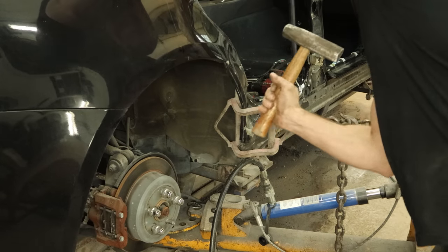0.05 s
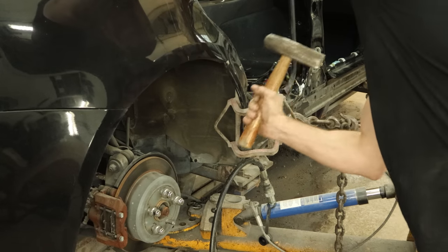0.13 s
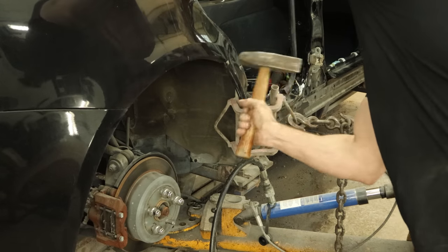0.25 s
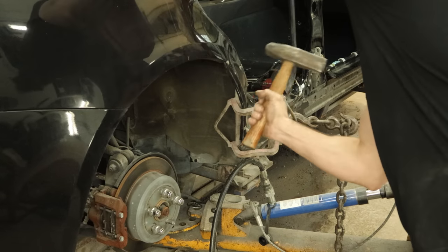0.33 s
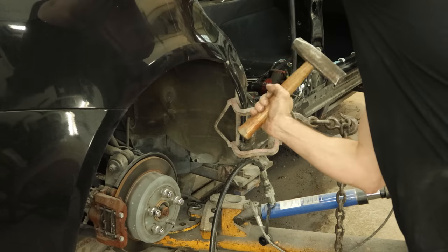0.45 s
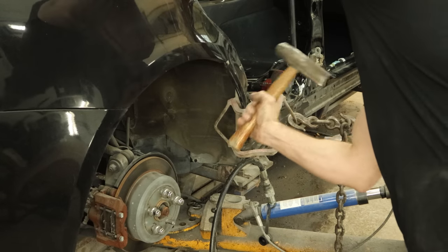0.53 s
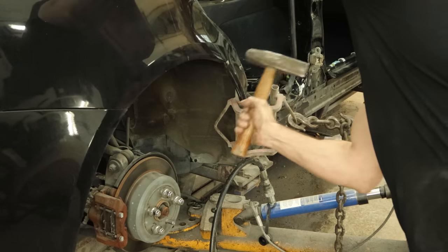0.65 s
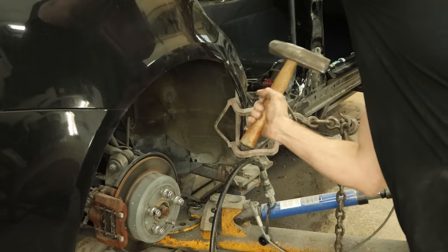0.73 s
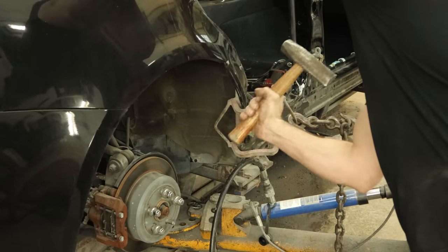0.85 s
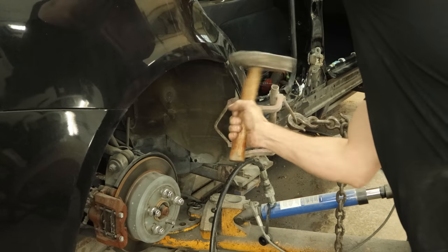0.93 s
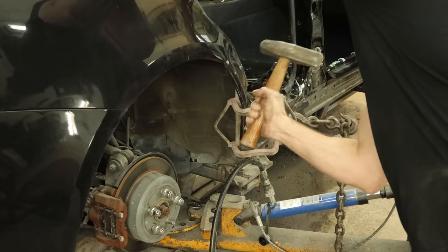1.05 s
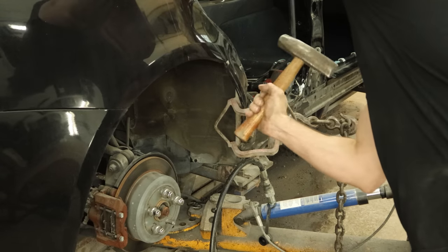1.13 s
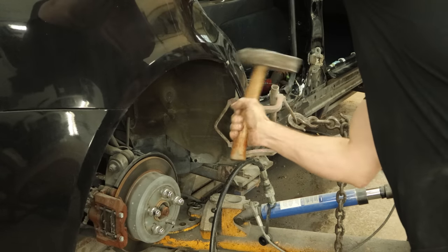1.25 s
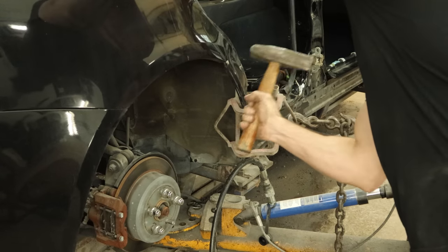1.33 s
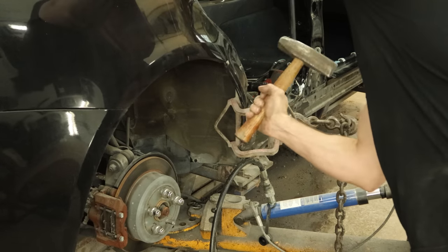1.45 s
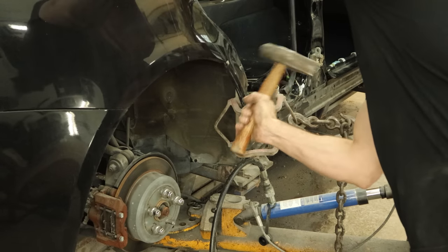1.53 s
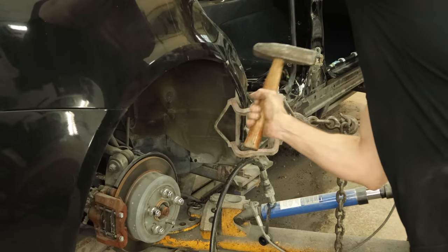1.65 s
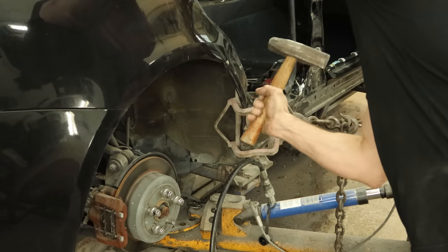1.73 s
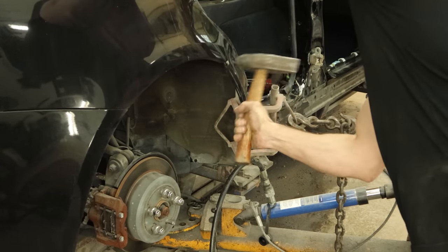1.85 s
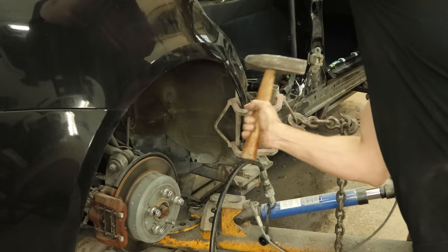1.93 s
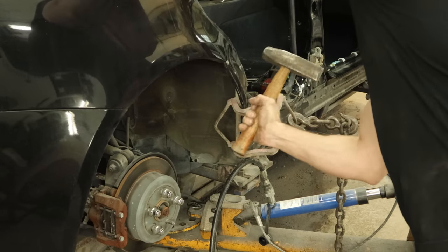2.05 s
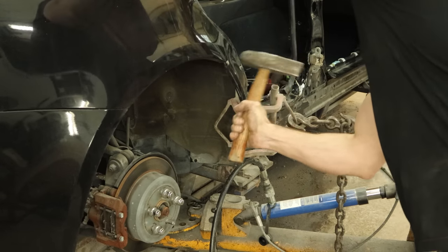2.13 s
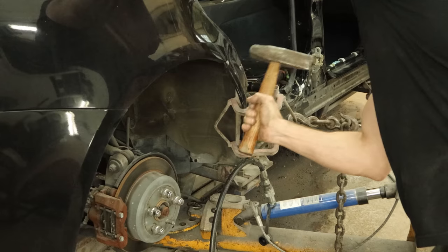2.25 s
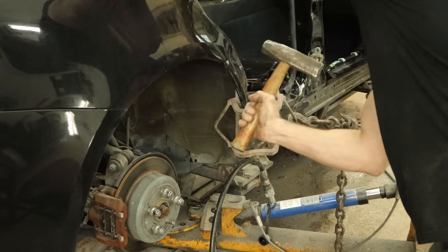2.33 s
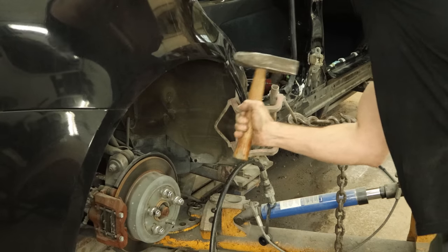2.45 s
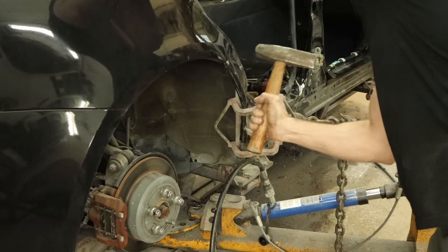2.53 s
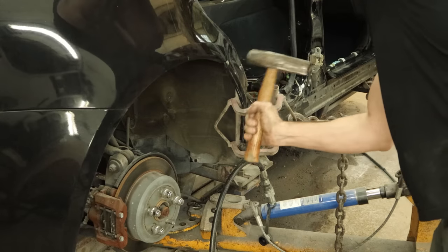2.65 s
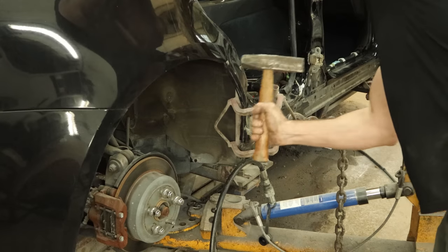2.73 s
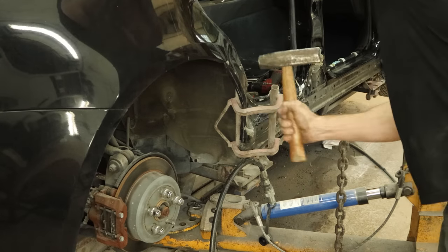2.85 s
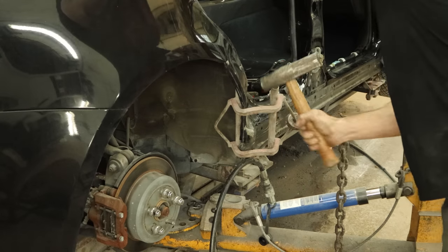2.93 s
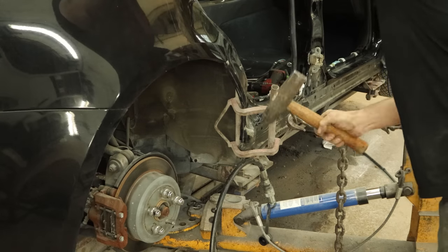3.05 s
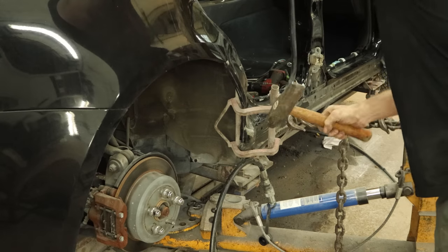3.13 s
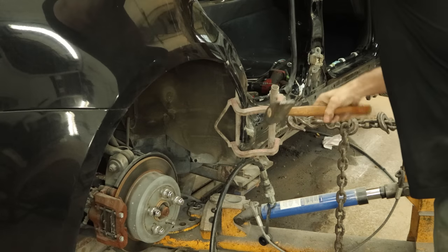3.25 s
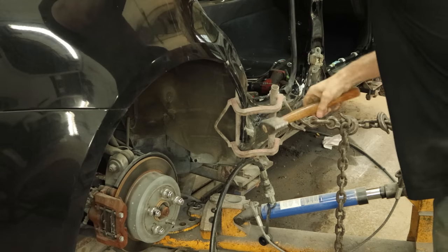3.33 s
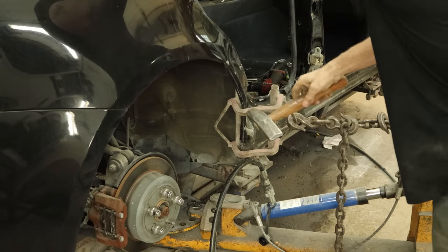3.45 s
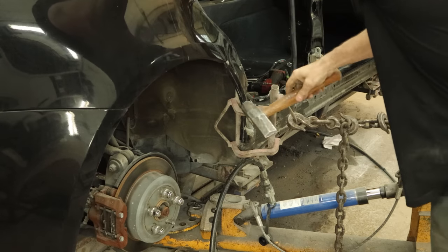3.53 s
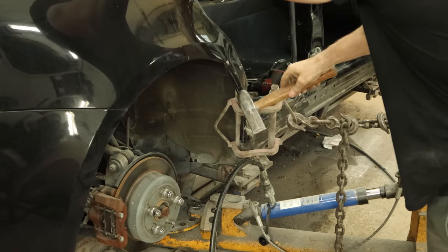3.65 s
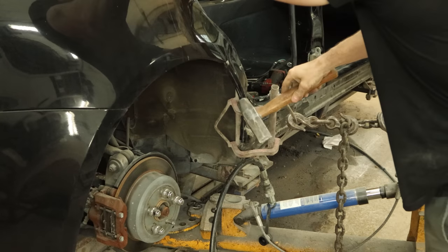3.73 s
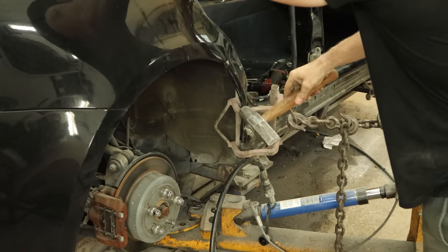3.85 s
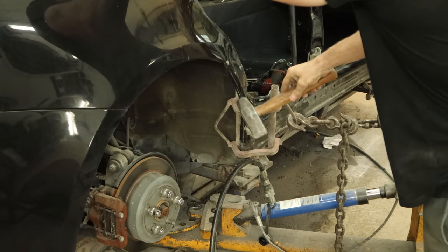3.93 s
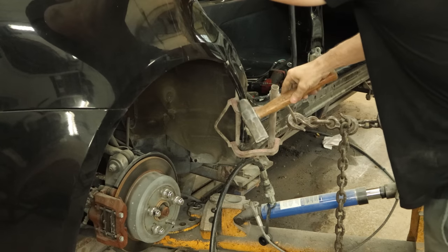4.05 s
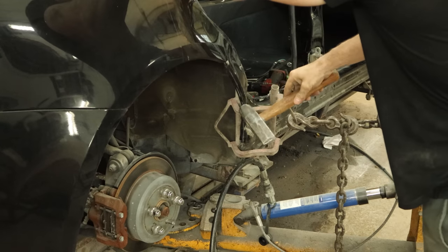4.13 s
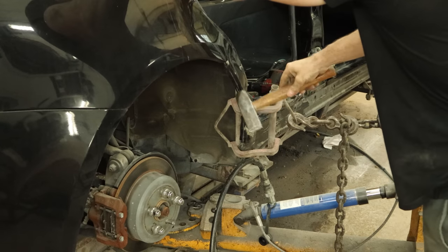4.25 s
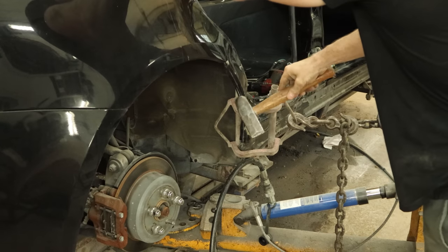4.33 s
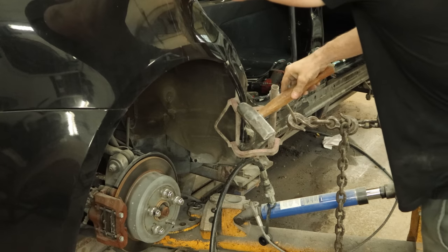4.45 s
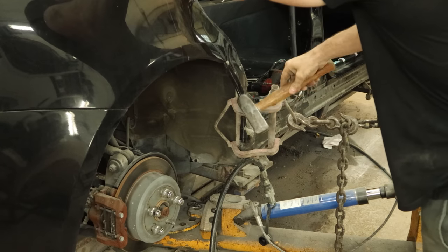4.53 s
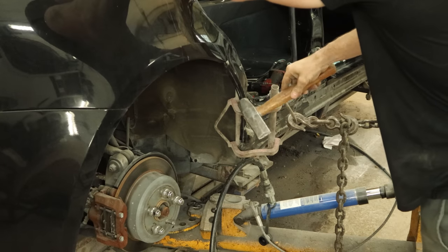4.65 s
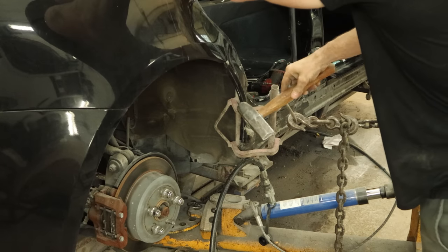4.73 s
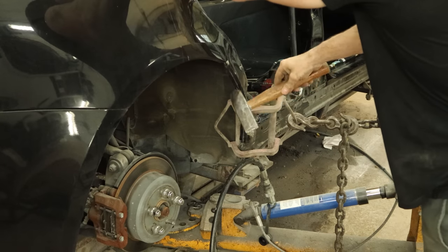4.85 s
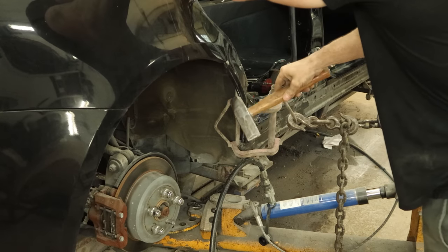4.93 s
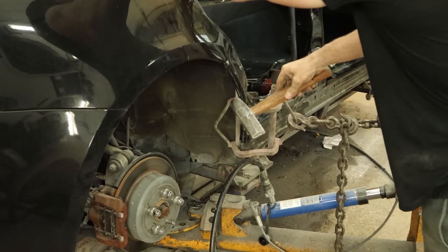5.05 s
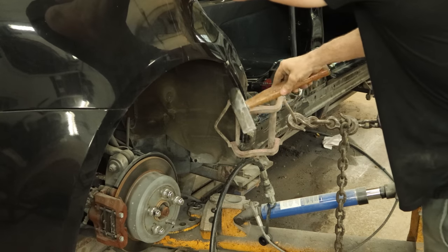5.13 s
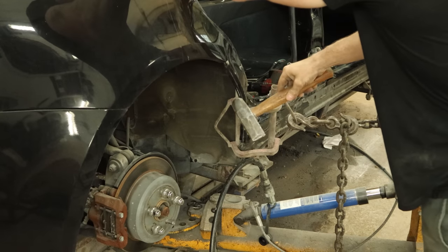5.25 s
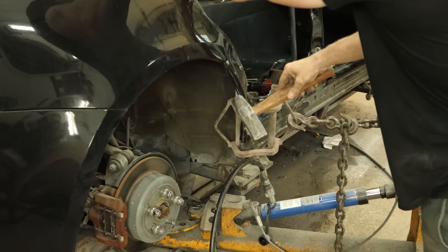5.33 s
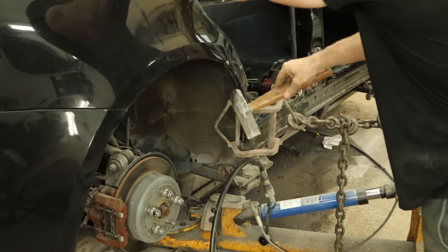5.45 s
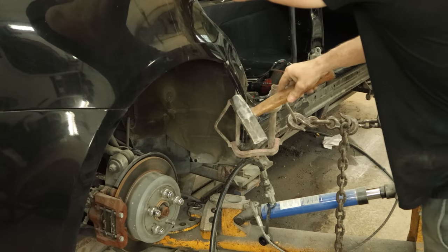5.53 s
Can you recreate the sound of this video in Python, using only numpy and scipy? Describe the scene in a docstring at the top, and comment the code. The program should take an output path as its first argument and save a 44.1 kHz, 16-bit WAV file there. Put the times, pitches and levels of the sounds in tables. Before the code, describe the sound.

A car repair workshop with quiet low rumble and a thin, faintly whistling hiss, picked up by a close mono microphone. From about 0.3 s a heavy steel hammer hits one spot of a car's crumpled wheel arch: nine hard blows, first almost 0.4 s apart, then about 0.3 s, ending at 2.8 s. They grow to a peak near 1.7 s, then ease off slightly. Each is an abrupt midrange crash and clang with a low thud, the body shell humming behind it and the room returning a diffuse wash under a second long. Loud hits sound compressed and blunted. The ringing fades; at 3.2 s there is a barely perceptible bright tick as the grip changes. From 3.8 to 5.5 s seven lighter, hollow knocks follow every 0.3 s along the edge, each with a different short clank; the one near 4.7 s is distinctly loudest. The last is still ringing near the end.

```python
"""Room rumble and a thin, singing hiss, then a hammer on the crumpled sheet metal of a car's wheel arch.
Nine hard blows land on one spot; a faint tick marks the change of grip; seven lighter knocks wander the edge.
Each stroke mixes dense noise bands (crash), damped sines (clang, knock, body ringing) and a steel tick.
A swelling noise wash is the repair workshop's answer. A gain control ducks the loud blows, a soft
clipper rounds their peaks, and a low-pass trims the top."""
import sys
import numpy as np
from scipy import signal
from scipy.fft import rfft, irfft
from scipy.io import wavfile
from scipy.ndimage import uniform_filter1d, minimum_filter1d

SR = 44100
rng = np.random.default_rng(int(sys.argv[2]) if len(sys.argv) > 2 else 0)


def master(y):
    """Save y as 16-bit WAV."""
    cut = np.clip(np.atleast_2d(y).T, -1, 1)
    pcm = np.round(cut * 32767)  # scale
    wavfile.write(sys.argv[1], SR, pcm.astype(np.int16))


N = 246210  # length of the scene [samples]
RING = np.arange(round(1.3 * SR)) / SR  # time since the stroke [s]
CUTOFF_HZ = 16100

# Levels inside a sound are relative: each sound is scaled to unit energy before it is mixed.
# Steady room rumble and microphone hiss: (frequency [Hz], relative density [dB per Hz])
FLOOR = [(20, -28), (50, -17), (85, -1), (150, -4.5), (300, -7), (500, -17), (1000, -20), (1900, -30.5),
         (4500, -31.5), (8200, -32), (9700, -28), (10700, -40), (12200, -40.5), (15500, -51)]
# Narrow bands that sing in the hiss: (centre [Hz], width [Hz], boost [dB])
HISS_PEAKS = [(7330, 150, 8), (8600, 200, 4.5), (9750, 240, 0.5), (11800, 220, 12)]
# How long the workshop rings: (frequency [Hz], t60 [s])
WORKSHOP = [(50, 0.66), (250, 0.93), (900, 0.74), (1800, 0.94), (3500, 0.64), (6500, 0.58), (10000, 0.26),
            (15000, 0.19)]
# What the edge sends into the room: (frequency [Hz], relative density [dB per Hz])
EDGE_ECHO = [(25, -26), (55, -11), (110, -14.5), (180, 1.5), (300, -3.5), (480, -6.5), (700, -8.5),
             (1000, -9.5), (1600, -14.5), (2800, -19.5), (4500, -24), (7500, -32.5), (11000, -38),
             (15000, -45)]
# What the struck spot sends into the room: (frequency [Hz], relative density [dB per Hz])
SPOT_ECHO = [(25, -21), (55, -11), (110, -4), (180, -9.5), (300, -3.5), (480, -5.5), (700, -0.5),
             (1000, -6.5), (1600, -8.5), (2800, -16.5), (4500, -23.5), (7500, -27.5), (11000, -35),
             (15000, -43.5)]
# Steel meeting steel in the first instant: (frequency [Hz], relative density [dB per Hz], t60 [s])
STEEL_TICK = [(816, -16, 0.016), (4030, 3.5, 0.011), (13900, -5, 0.005)]
# Crowd of small modes in the metal of the edge: (frequency [Hz], relative density [dB per Hz], t60 [s])
EDGE_CRASH = [(25, -27, 0.36), (74.5, -52, 0.13), (175, -1.5, 0.16), (300, -3.5, 0.38), (595, 2, 0.3),
              (890, -12.5, 0.42), (1480, -9, 0.24), (2880, -11.5, 0.11), (4700, -19, 0.12),
              (7600, -23, 0.091), (10400, -34.5, 0.064), (15000, -28, 0.03)]
# Crowd of small modes in the metal of the spot: (frequency [Hz], relative density [dB per Hz], t60 [s])
SPOT_CRASH = [(25, -25.5, 0.11), (58.4, -11.5, 0.081), (129, -2.5, 0.18), (294, -3, 0.31), (760, -1, 0.13),
              (930, -9.5, 0.053), (1560, -5.5, 0.21), (2630, -13.5, 0.11), (4320, -21, 0.12),
              (8000, -25.5, 0.088), (9740, -35, 0.19), (15000, -33, 0.09)]
# Modes of the edge: (frequency [Hz], relative level [dB], t60 [s])
EDGE_MODES = [(137, -9.4, 0.17), (181, 0.0, 0.21), (219, -21.7, 0.23), (253, -8.3, 0.11), (343, -8.5, 0.12),
              (411, -15.7, 0.15), (481, -13.9, 0.13), (588, -9, 0.07), (904, -12.7, 0.09),
              (1004, -12.2, 0.14), (1078, -14.1, 0.14), (1160, -19.5, 0.14), (1211, -12.7, 0.08),
              (1558, -14, 0.08), (1773, -16.8, 0.14), (1816, -14.1, 0.09)]
# Long ringing that the edge knocks set off in the body shell: (frequency [Hz], relative level [dB], t60 [s])
ARCH_MODES = [(161, -3, 0.65), (176, 0, 0.65), (196, -3, 0.65), (227, -1, 0.65), (254, -5, 0.65),
              (261, -5, 0.65), (294, -6, 0.65), (487, -5, 0.65)]
# Modes of the struck spot: (frequency [Hz], relative level [dB], t60 [s])
SPOT_MODES = [(113, -3.7, 0.19), (174, -12.0, 0.17), (201, -18.6, 0.15), (274, -10.5, 0.12),
              (326, -4.9, 0.15), (394, -8.4, 0.18), (518, -12.6, 0.13), (563, -8.8, 0.15), (683, 0.0, 0.07),
              (729, -2.4, 0.09), (804, -8.9, 0.14), (871, -9.2, 0.08), (925, -12.3, 0.14),
              (1088, -6.3, 0.07), (1212, -11.8, 0.11), (1268, -7.6, 0.11), (1316, -10.9, 0.13),
              (1394, -6.5, 0.07), (1602, -5.5, 0.1), (1773, -7.2, 0.09), (1836, -11.2, 0.1),
              (2068, -12, 0.06), (2571, -10.2, 0.04), (2713, -16.9, 0.07), (3092, -15, 0.06),
              (3700, -15, 0.05)]
# Long ringing that the hard blows set off in the body shell: (frequency [Hz], relative level [dB], t60 [s])
SHELL_MODES = [(51.1, -10.5, 0.79), (83, -9, 0.39), (92.6, -8.5, 0.99), (119.2, -6, 1.5), (270, -6.5, 0.71),
               (276.8, 4, 0.48), (294.5, -7.5, 1.7), (302.4, -2, 0.86), (357.3, -5, 0.91), (431, 4, 0.62),
               (544.5, 1.5, 0.86), (647, -5.5, 0.8), (705, -2, 0.8), (895, -3.5, 0.55)]
# Lighter knocks along the edge: (time [s], strength [dB], local clank [Hz], clank level in the mix [dB])
KNOCKS = [(3.773, -28, 980, -8.5), (4.089, -25.5, 1140, -21.5), (4.3844, -20.5, 918, -18),
          (4.6833, -11, 1230, -16.5), (4.9737, -21.5, 622, -9), (5.2483, -24, 1070, -15),
          (5.5307, -23, 1125, -7)]
# Hard blows on one spot: (time [s], strength [dB])
BLOWS = [(0.3372, -13.5), (0.7243, -11.5), (1.063, -7), (1.390, -4), (1.6985, -0.5), (1.992, -2.5),
         (2.283, -6.5), (2.550, -6), (2.8130, -7.5)]

# A typical stroke: strength and colour [dB], colour shift per dB of extra strength, rise time [s]
EDGE_STROKE = dict(typical_db=-22.5, bass_db=1.5, treble_db=2.5, bass_per_db=-0.3, treble_per_db=-0.62,
                   rise_s=0.0013)
SPOT_STROKE = dict(typical_db=-6, bass_db=-0.5, treble_db=0.5, bass_per_db=-0.3, treble_per_db=-0.26,
                   rise_s=0.0002)


def amp(db):
    """Decibels to gain."""
    return 10 ** (np.asarray(db) / 20)


def unit(x):
    """Scales a sound to an energy of one."""
    return x / np.sqrt(np.sum(x ** 2) + 1e-20)


def add(mix, start_s, sound):
    """Mixes a sound in place, trimmed at the end of the scene."""
    part = mix[round(start_s * SR):][:len(sound)]
    part += sound[:len(part)]


def lowpass(x, hz):
    """A gentle one-pole low-pass."""
    return signal.lfilter(*signal.butter(1, hz, fs=SR), x)


def decay(t, t60):
    """Exponential fade that drops 60 dB in t60 seconds."""
    return np.exp(-np.log(1000) * t / t60)


def dying_noise(bands, hold):
    """Noise whose overlapping bands hold for some seconds, then each die at their own speed."""
    centres, levels, t60s = np.transpose(bands)
    hz = np.fft.rfftfreq(len(RING), 1 / SR)
    noise = rfft(rng.standard_normal(len(RING)))
    out = 0
    for pick, db, t60 in zip(np.eye(len(bands)), levels, t60s):
        share = np.interp(np.log(hz + 1), np.log(centres), pick)  # crossfades between neighbouring bands
        band = irfft(noise * share, len(RING))
        band = band * decay(np.maximum(RING - hold, 0), t60)
        bandwidth_gain = np.sqrt(share.sum())  # levels are per Hz, so wide bands carry more
        out = out + amp(db) * bandwidth_gain * unit(band)
    return unit(out)


def ringing(modes, build_cycles, scatter_db, detune, slow_hz=220):
    """Damped modes that build over a few cycles; each stroke weighs and bends them a little differently."""
    out = 0
    variations = rng.standard_normal((len(modes), 2))
    for k, ((hz, db, t60), (weight, bend)) in enumerate(zip(modes, variations)):
        t = RING[:round(1.5 * t60 * SR)]
        build_s = build_cycles / hz * (1 + (slow_hz / hz) ** 2)  # long bending waves spread slowly in the sheet
        envelope = (1 - np.exp(-t / build_s)) * decay(t, t60)
        mode = unit(envelope * np.sin(2 * np.pi * hz * (1 + detune * bend) * t))
        polarity = (-1) ** k
        level = amp(db + scatter_db * weight)
        out = out + polarity * level * np.pad(mode, (0, len(RING) - len(t)))
    return unit(out)


def stroke(db, typical_db, bass_db, treble_db, bass_per_db, treble_per_db, rise_s):
    """A harder stroke favours the midrange: gives (strength [dB], bass [dB], treble [dB], rise [s])."""
    extra = db - typical_db
    return db, bass_db + bass_per_db * extra, treble_db + treble_per_db * extra, rise_s


def contact(sound, db, bass_db, treble_db, rise):
    """Strength and the way the hammer face lands set level, colour and attack."""
    sound = sound * (1 - np.exp(-RING / max(rise, 1 / SR)))
    sound = sound + (amp(bass_db) - 1) * lowpass(sound, 160)  # bass shelf
    sound = sound + (amp(treble_db) - 1) * (sound - lowpass(sound, 2600))  # treble shelf
    return amp(db) * np.sqrt(0.02 * SR) * sound  # strength is the rms of unit energy packed into 20 ms


def room_floor(level_db=-55):
    """Steady noise: room rumble under the microphone's uneven hiss, with narrow resonant peaks."""
    hz = np.fft.rfftfreq(N, 1 / SR)
    points, levels = np.transpose(FLOOR)
    db = np.interp(np.log(hz + 1), np.log(points), levels)
    for centre, width, boost in HISS_PEAKS:
        db = db + boost / (1 + (2 * (hz - centre) / width) ** 2)
    noise = irfft(rfft(rng.standard_normal(N)) * amp(db), N)
    return amp(level_db) * np.sqrt(N) * unit(noise)  # level_db is the rms


def echo(colour, build=0.0018):
    """The diffuse wash that the workshop returns: dying noise that swells in over some milliseconds."""
    room_hz, room_t60 = np.transpose(WORKSHOP)
    bands = [(hz, db, np.interp(np.log(hz), np.log(room_hz), room_t60)) for hz, db in colour]
    swell = 1 - np.exp(-(RING / build) ** 2)
    return unit(dying_noise(bands, hold=0.0063) * swell)


def grip_change(start_s=3.173, db=-73, treble_db=24):
    """One faint, bright tick of dying noise as the hammer is turned in the hand."""
    out = np.zeros(N)
    tick = dying_noise(EDGE_CRASH, hold=0.012)
    add(out, start_s, contact(tick, db, bass_db=0, treble_db=treble_db, rise=0.006))
    return out


def edge_knocks(lowest_hz=125, clank_t60=0.17):
    """The hammer wanders along the edge: a hollow knock, plus a clank that belongs to where it lands."""
    out = np.zeros(N)
    crash = dying_noise(EDGE_CRASH, hold=0.0054)
    wash = echo(EDGE_ECHO)
    low_cut = signal.butter(2, lowest_hz, "highpass", fs=SR)  # the knocks carry little deep bass
    for start_s, db, clank_hz, clank_db in KNOCKS:
        # much of the crash and wash is new at each place
        crash = unit(crash + 1.33 * dying_noise(EDGE_CRASH, hold=0.0022))
        wash = unit(wash + 2.04 * echo(EDGE_ECHO))
        knock = ringing(EDGE_MODES, build_cycles=0.69, scatter_db=1.5, detune=0.0082)
        knock = signal.lfilter(*low_cut, knock)
        clank = ringing([(clank_hz, 0, clank_t60)], build_cycles=1.5, scatter_db=0, detune=0)
        drone = ringing(ARCH_MODES, build_cycles=6.2, scatter_db=2.5, detune=0.0033)
        tick = dying_noise(STEEL_TICK, hold=0)
        metal = amp(-4.5) * crash + amp(-1.5) * knock + amp(clank_db) * clank
        metal = metal + amp(-13) * drone + amp(-19) * tick
        add(out, start_s, contact(metal + amp(-7) * wash, *stroke(db, **EDGE_STROKE)))
    return out


def hard_blows():
    """The same spot gives nearly the same clang each time, and sets the whole shell ringing."""
    out = np.zeros(N)
    crash = dying_noise(SPOT_CRASH, hold=0.0063)
    wash = echo(SPOT_ECHO)
    for start_s, db in BLOWS:
        crash = unit(crash + 0.47 * dying_noise(SPOT_CRASH, hold=0.0044))  # each blow reshapes the dent a little
        wash = unit(wash + 0.53 * echo(SPOT_ECHO))
        clang = ringing(SPOT_MODES, build_cycles=0.65, scatter_db=0.4, detune=0.0025)
        shell = ringing(SHELL_MODES, build_cycles=6.9, scatter_db=0.5, detune=0.00051)
        tick = dying_noise(STEEL_TICK, hold=0)
        metal = amp(-3.5) * crash + amp(-3) * clang + amp(-14) * shell + amp(-26) * tick
        add(out, start_s, contact(metal + amp(-7) * wash, *stroke(db, **SPOT_STROKE)))
    return out


def scene():
    """Both runs of hammering over the workshop floor noise, in mono."""
    return (room_floor() + grip_change() + edge_knocks() + hard_blows())[None]


def gain_cut(x, limit_db=-21.0, attack=0.0011, hold=0.028, release_db=160, creep_db=130, patience_db=14,
             recover_db=7.0, size=32):
    """Cut in dB: a limiter ducks peaks; repeated overload winds a slow stage down too (rates in dB a second)."""
    step = size / SR  # seconds per control step
    power = uniform_filter1d(x ** 2, size=3 * size)[::size]
    excess = 10 * np.log10(abs(power) + 1e-12) - limit_db
    span = max(round(hold / step), 1)
    held = -minimum_filter1d(-excess, span, origin=(span - 1) // 2)  # keeps each peak for the hold time
    fast, strain, slow, cuts = 0, 0, 0, []
    for over in held.tolist():
        if over > fast:
            fast += (over - fast) * min(step / attack, 1)
        else:
            fast = max(fast - release_db * step, over, slow)
        creep = creep_db * min(max(over - slow, 0), 1)
        strain = max(strain + (creep - recover_db) * step, 0)
        slow = max(strain - patience_db, 0)  # acts only once strain exceeds the patience
        cuts.append(max(fast, slow))
    return np.interp(np.arange(N), np.arange(len(cuts)) * size, cuts)


def record(dry):
    """Gain control, then soft clipping of the peaks that slip through, then the band limit."""
    ducked = dry[0] / amp(gain_cut(dry[0]))
    ceiling = 0.21  # full scale is 1
    clipped = ducked / (1 + (ducked / ceiling) ** 8) ** (1 / 8)
    band_limit = signal.firwin(301, CUTOFF_HZ, window=("kaiser", 9), fs=SR)
    return signal.oaconvolve(clipped, band_limit, "same")[None]


dry = scene()
out = record(dry)
master(out)
```